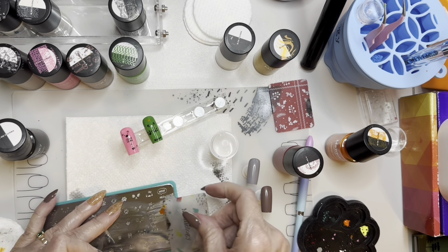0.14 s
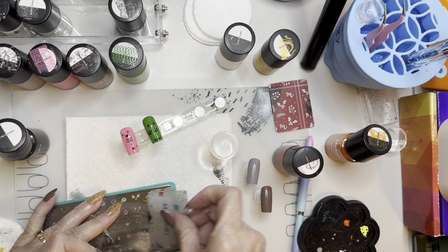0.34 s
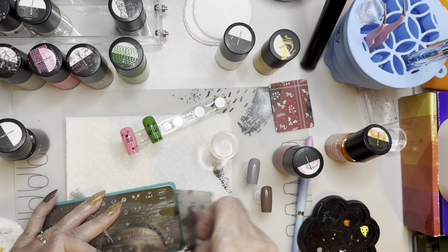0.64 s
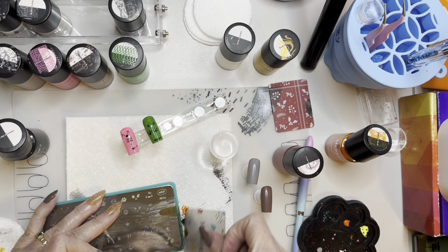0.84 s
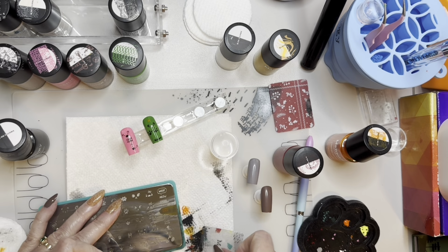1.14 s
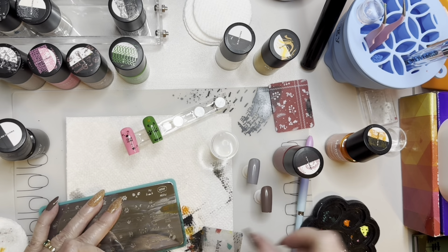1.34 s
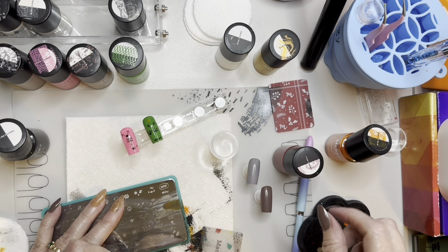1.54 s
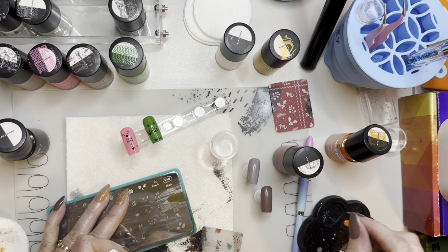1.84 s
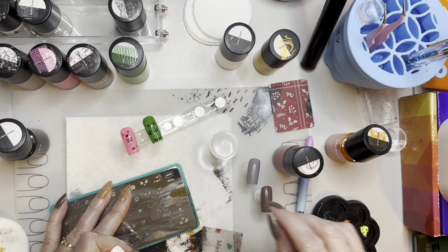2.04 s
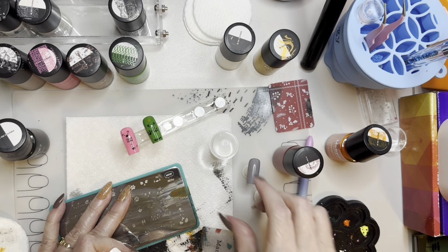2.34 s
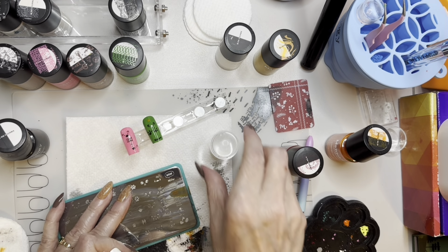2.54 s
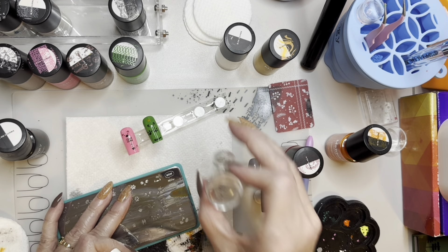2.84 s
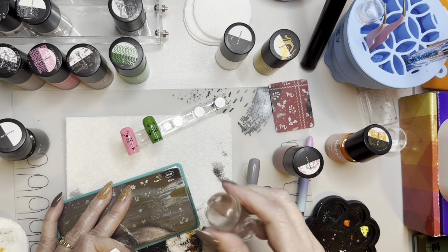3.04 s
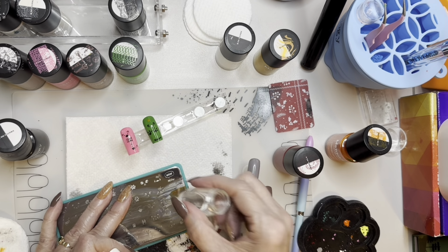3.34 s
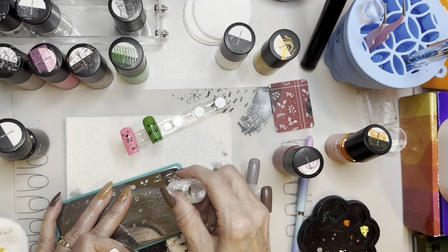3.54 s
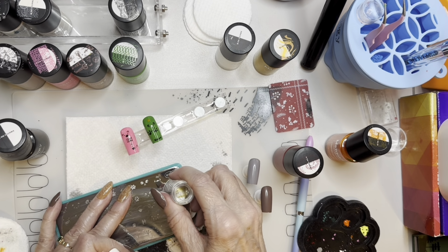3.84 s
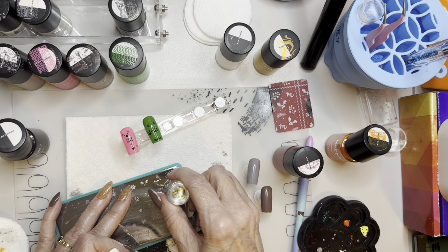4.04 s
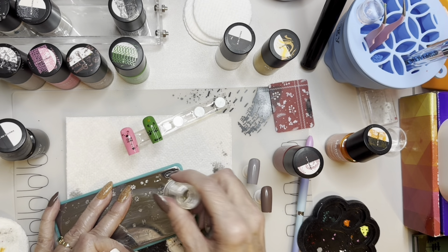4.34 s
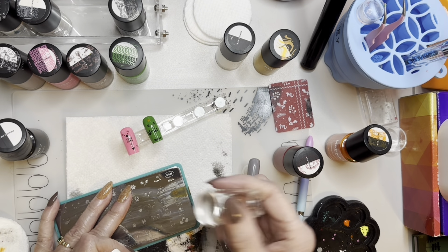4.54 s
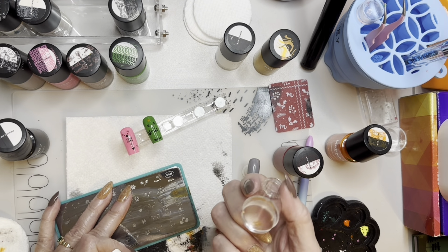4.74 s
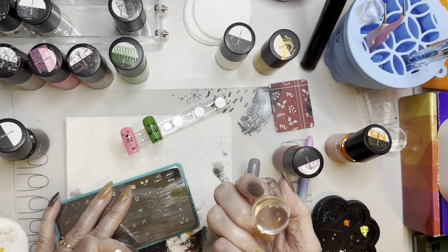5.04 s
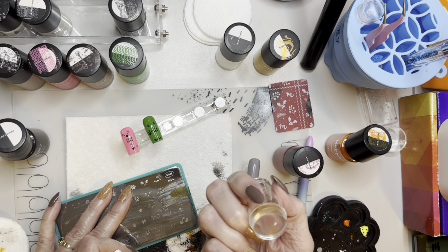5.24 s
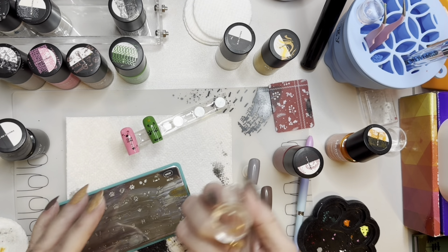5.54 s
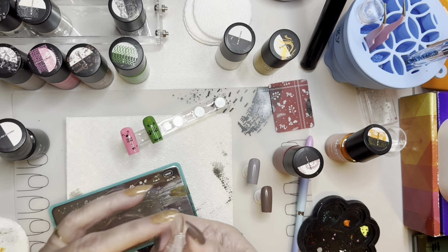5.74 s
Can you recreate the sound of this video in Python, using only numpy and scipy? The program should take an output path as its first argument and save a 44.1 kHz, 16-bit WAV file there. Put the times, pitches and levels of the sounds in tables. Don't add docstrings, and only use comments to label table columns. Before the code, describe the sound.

Close dry scraping and sharp snaps of plastic on metal, one hard slap on a desk, later a stuttering rub, over faint hum.

```python
import sys
import numpy as np
from scipy import signal
from scipy.fft import rfft, irfft, next_fast_len
from scipy.io import wavfile

SR = 44100
rng = np.random.default_rng(int(sys.argv[2]) if len(sys.argv) > 2 else 0)


def boost(x):
    u = np.asarray(x, float) / 20
    return 10 ** u


def master(y):
    cut = np.clip(np.atleast_2d(y).T, -1, 1)
    pcm = np.round(cut * 32767)
    wavfile.write(sys.argv[1], SR, pcm.astype(np.int16))


N = 260234
PADDED = next_fast_len(N + SR // 2)
STAMP_FROM_S = 3.1


def rms_one(x):
    return x / np.sqrt(np.mean(x ** 2) + 1e-20)


def at_hz(points, hz):
    table_hz, value = np.array(points)[:, 0], np.array(points)[:, 1]
    return np.interp(np.log(np.maximum(hz, 1)), np.log(table_hz), value)


def bins():
    return np.arange(PADDED // 2 + 1) * SR / PADDED


def drift(rate):
    r = np.exp(-40 * np.pi * rate / SR)
    slow = signal.lfilter([1], [1, -2 * r, r * r], rng.standard_normal(N // 20 + 2002))[2000:]
    return np.interp(np.arange(N) / 20, np.arange(len(slow)), rms_one(slow))


def coloured(spectrum):
    white = rfft(rng.standard_normal(PADDED))
    return irfft(white * boost(at_hz(spectrum, bins())))[:N]


def resonate(x, modes):
    out = 0
    for hz, width_hz, db in modes:
        r = np.exp(-np.pi * width_hz / SR)
        b = (1 - r * r) / 2 * np.array([1, 0, -1]) * boost(db)
        out = out + signal.lfilter(b, [1, -2 * r * np.cos(2 * np.pi * hz / SR), r * r], x + 1e-18)
    edges = [.84 * modes[0][0], min(1.08 * modes[-1][0], .45 * SR)]
    return signal.sosfilt(signal.butter(3, edges, "band", fs=SR, output="sos"), out)


def ticks(rows, column, modes, chatter_s=0.0028):
    rows, clicks = np.array(rows), np.zeros(N)
    np.add.at(clicks, np.round(rows[:, 0] * SR).astype(int), -boost(rows[:, column]))
    dying = signal.lfilter([0, 1], [1, -np.exp(-1 / (chatter_s * SR))], clicks + 1e-18)
    chatter = .05 * dying * rng.standard_normal(N)
    peak = np.abs(resonate(signal.unit_impulse(2000), modes)).max()
    return resonate(clicks + chatter, modes) / peak


def layered(s, db, bright_db, low_db):
    return np.column_stack(np.broadcast_arrays(s, db, db + bright_db, db + low_db))


# (frequency [Hz], density [dB per Hz])
HUM = [(15, -49.5), (25, -28), (39, -5.5), (59, 1), (177, -15.5), (206, -15), (311, -16.5), (361, -25.5),
       (468, -20.5), (784, -26), (855, -24.5), (1060, -33), (1900, -31), (4300, -49.5), (5590, -83.5),
       (9460, -120)]
# (frequency [Hz], side over mid [dB])
DIFFUSE = [(60, -33.5), (110, -26.5), (200, -9), (380, -6.5), (700, 2), (1290, 2), (2380, -20),
           (4400, -1.5), (8120, -11.5), (15000, 5)]
# (frequency [Hz], width [Hz], level [dB])
MOTOR = [(55, 3.9, -2), (124, 20, -8)]
HUM_DB, MOTOR_DB = -54.5, -59.5


def hum():
    mid = coloured(HUM)
    side = coloured([(hz, db + at_hz(DIFFUSE, hz)) for hz, db in HUM])
    gain = boost(HUM_DB + 1.2 * drift(2)) / np.std(mid)
    motor = boost(MOTOR_DB) * rms_one(resonate(rng.standard_normal(N), MOTOR))
    return gain * (mid + side * [[1], [-1]]) + motor


# (frequency [Hz], density [dB per Hz])
AIR_SPECTRUM = [(4000, -26), (5000, -11.5), (7300, -2.5), (10000, -9.5), (12000, -9), (15000, -2),
                (16500, -9)]
AIR_DB = -79.5


def air():
    return boost(AIR_DB) * rms_one(coloured(AIR_SPECTRUM))


ROOM_T60_S, TREBLE_T60_S, NEAR_T60_S = 0.33, 0.31, 0.022
ROOM_DB, NEAR_DB = -9, -6


def room(x):
    t = np.arange(SR // 2) / SR
    white = rng.standard_normal((2, 2, len(t))) * np.minimum(t / 0.0036, 1)
    dull = signal.sosfilt(signal.butter(2, 3000, fs=SR, output="sos"), white[0])
    tail = dull * boost(-60 * t / ROOM_T60_S) + (white[0] - dull) * boost(-60 * t / TREBLE_T60_S)
    near = white[1] * boost(-60 * t / NEAR_T60_S)
    answer = boost(ROOM_DB) * tail / np.linalg.norm(tail[0])
    answer = answer + boost(NEAR_DB) * near / np.linalg.norm(near[0])
    return irfft(rfft(answer, PADDED) * rfft(x, PADDED), PADDED)[:, :N]


# (frequency [Hz], phase [rad])
IN_STEP = [(30, 0), (520, 0)]
PORT_LEAD = [(900, .9), (1300, .1), (4600, -.7), (4950, -np.pi), (5200, -2 * np.pi), (7200, -2.03 * np.pi),
             (9650, -8.1)]
OPPOSED = [(10900, -2.98 * np.pi), (13900, -3.01 * np.pi), (14600, -3.3 * np.pi), (15800, -3.4 * np.pi)]
# (frequency [Hz], gain [dB])
PORT_COLOUR = [(3150, 0), (3700, -1.5), (4200, -1.5), (5500, -0.5), (10200, -1), (11200, -2), (13000, -12),
               (15000, -2.5)]


def ports(x, left_db):
    hz, side = bins(), np.array([[.5], [-.5]])
    lead = at_hz(list(IN_STEP) + list(PORT_LEAD) + list(OPPOSED), hz)
    louder_left = left_db * (hz > 700) * (hz < 5150) * (1 + 2 * (hz > 4700))
    response = np.exp(1j * lead * side) * boost(louder_left * side + at_hz(PORT_COLOUR, hz))
    return irfft(rfft(x, PADDED) * response, PADDED)[:, :N]


# (time [s], peak [dB])
THUMPS = [
    (0.122, -39),
    (0.727, -49),
    (1.221, -30.5),
    (3.177, -43.5),
    (3.197, -43),
]
# (frequency [Hz], width [Hz], level [dB])
DESK = [(75.4, 10, -2), (118, 36, -0.5), (181, 27, -2.5), (223, 29, -2), (330, 42, 0.5)]


def desk_thumps():
    return ticks(THUMPS, column=1, modes=DESK, chatter_s=0.035)


# (start [s], length [s], first level [dB], last level [dB], bright share [dB])
STROKES = [(0.0, .1, -66.5, -70.5, 3), (0.162, 0.082, -40.5, -46.5, -25.5),
           (0.246, .26, -46.5, -46.5, -24.5), (0.567, 0.15, -46.5, -54, -14),
           (0.938, .03, -70, -65.5, -2.5), (0.977, 0.13, -59.5, -56.5, 0), (1.143, .06, -66.5, -59.5, -2),
           (1.463, .26, -65, -69.5, 1.5), (1.788, .3, -61, -72, 3.5), (2.126, .2, -78.5, -77, -16),
           (2.413, 0.086, -79.5, -82, 3), (2.683, 0.095, -68, -87, 3.5), (2.959, 0.21, -88, -85, 12.5),
           (3.237, .1, -50, -62, -21.5), (3.377, .37, -51.5, -51.5, -20.5), (3.751, .33, -57, -76.5, -34),
           (4.304, 0.0835, -75, -75, 5), (4.425, 0.081, -65, -62, -29), (5.44, .05, -60, -71, 3.5),
           (5.527, 0.13, -83.5, -80.5, 13)]
# (start [s], level [dB], bright share [dB], length [s])
SLIPS = [(3.327, -48, -25.5, 0.007), (3.384, -49, -26, 0.0079), (3.396, -44, -22, 0.02),
         (3.425, -50, -22, 0.019), (3.446, -37.5, -17, 0.02), (3.472, -43, -12, .014),
         (3.508, -38.5, -15.5, 0.0098), (3.541, -39.5, -21, 0.012), (3.57, -38, -19, .012),
         (3.589, -43.5, -21, 0.015), (3.619, -36.5, -26, 0.011), (3.647, -41.5, -24, 0.014),
         (3.657, -42, -22.5, .016), (3.695, -37.5, -32.5, 0.012), (3.713, -44.5, -28, .014),
         (3.733, -44.5, -46, 0.02), (3.781, -50, -42, 0.011), (3.823, -55, -42, .008),
         (3.852, -56, -36, 0.004), (3.904, -63, -30.5, 0.0045), (3.949, -63, -30, 0.016),
         (4.425, -54, -28, 0.02), (4.45, -50.5, -22, 0.012), (4.469, -54, -28, .018),
         (4.538, -45, -28, .007)]
# (from [s], to [s])
ON_PLATE = [
    (.1, .9),
    (3.15, 4.15),
    (4.42, 4.6),
]
STROKE_ATTACK_S, STROKE_RELEASE_S, STROKE_LOW_DB = .015, .02, -6.5
SLIP_ATTACK_S, SLIP_RELEASE_S, SLIP_LOW_DB = .002, 0.0056, -18
PLATE_LOW_FOLLOWS = .6


def rubbing(column):
    t, level = np.arange(N) / SR, np.zeros(N)

    def add(s, length_s, db, attack_s, release_s):
        on = slice(int(max(s, 0) * SR), int((s + length_s + 8 * release_s) * SR))
        lift = np.exp(-np.maximum(t[on] - s - length_s, 0) / release_s)
        attack = np.clip((t[on] - s) / attack_s, 0, 1)
        level[on] += boost(np.interp(t[on], [s, s + length_s], db)) * lift * attack

    for s, length_s, first_db, last_db, bright_db in STROKES:
        db = np.array([first_db, last_db])
        metal = any(a < s < b for a, b in ON_PLATE)
        slack = (1 - PLATE_LOW_FOLLOWS) * (-50 - db) * metal
        share_db = [0, bright_db, STROKE_LOW_DB + slack][column - 1]
        add(s, length_s, db + share_db, STROKE_ATTACK_S, STROKE_RELEASE_S)
    for s, db, bright_db, length_s in SLIPS:
        share_db = [0, bright_db, SLIP_LOW_DB][column - 1]
        add(s, length_s, db + share_db + np.zeros(2), SLIP_ATTACK_S, SLIP_RELEASE_S)
    return level


def drag(column, on_metal, on_paper, per_s, size_db, stutter_db):
    sizes = boost(size_db * np.minimum(rng.exponential(1, N), 4)) * rng.standard_normal(N)
    grains, t = sizes * (rng.random(N) < per_s / SR), np.arange(N) / SR
    metal = sum((t > start) & (t < end) for start, end in ON_PLATE)
    rung = np.where(metal, rms_one(resonate(grains, on_metal)), rms_one(resonate(grains, on_paper)))
    return rubbing(column) * boost(stutter_db * drift(55)) * rung


# (frequency [Hz], width [Hz], level [dB])
DRAGGED_PLATE = [(2040, 90, -4), (2320, 100, 5.5), (2498, 120, -6), (2740, 150, -1.5), (3260, 200, -10),
                 (4200, 400, -24)]
DRAGGED_BRIGHT = [(5800, 140, 0.5), (6550, 400, -6), (7800, 500, -4.5), (8680, 1400, -14),
                  (14800, 1500, -18)]
PRESSED_PLATE = [(2045, 91, -5.5), (2306, 130, 5.5), (2614, 150, 4.5), (2798, 100, 6), (2960, 50, -8),
                 (4250, 370, -11.5)]
PLATE_BRIGHT = [(5430, 270, -1.5), (6310, 1300, 5), (8188, 560, -4), (8934, 1300, -4.5),
                (11600, 13000, -22.5), (14510, 500, -22)]
PAPER = [(1590, 1500, -8), (2500, 400, -5), (2950, 350, 3.5), (3900, 700, -4)]
PAPER_BRIGHT = [(5960, 800, -2.5), (7227, 1000, -7.5), (7517, 4100, -8), (9100, 4700, -2),
                (11676, 7500, -3), (15400, 660, -22)]
LOW = [(470, 140, 0.5), (644, 83, -3.5), (837, 140, -5), (1123, 88, 4.5), (1383, 150, -3), (1730, 180, -5)]


def rubbed():
    early = np.arange(N) < STAMP_FROM_S * SR
    card_body = drag(1, DRAGGED_PLATE, PAPER, per_s=17000, size_db=-3.5, stutter_db=-3.06)
    stamp_body = drag(1, PRESSED_PLATE, PAPER, per_s=12000, size_db=2.0, stutter_db=-0.16)
    card_bright = drag(2, DRAGGED_BRIGHT, PAPER_BRIGHT, per_s=19000, size_db=3.5, stutter_db=1.0)
    stamp_bright = drag(2, PLATE_BRIGHT, PAPER_BRIGHT, per_s=16000, size_db=-2.0, stutter_db=1.4)
    low = drag(3, LOW, LOW, per_s=9000, size_db=2.0, stutter_db=2.0)
    card = boost(-6.5) * card_body + boost(0.5) * card_bright
    stamp = boost(-11.0) * stamp_body + boost(-5.0) * stamp_bright
    return np.where(early, card, stamp) + boost(-3.5) * low


LOW_LAG_S = 0.00068


def late(low):
    return np.roll(low, int(LOW_LAG_S * SR))


# (time [s], peak [dB], bright share [dB], low share [dB])
CARD_TICKS = [(0.9534, -54, -1, 6), (1.0801, -54.5, 8.5, -13), (1.1, -38.5, -3, -10),
              (1.1051, -40, 0.5, -9.5), (1.1158, -31, 3.5, -10.5), (1.1249, -30, 2.5, -11),
              (1.1575, -38.5, -10, -11.5), (1.168, -38.5, 1.5, -20), (1.1935, -49.5, 10.5, -15.5),
              (1.9283, -64, 14, -13), (1.9375, -50, 7.5, -9.5), (1.9658, -67, 18, -6),
              (2.6974, -57.5, 4, -3), (2.7089, -41.5, 7.5, -2), (2.7552, -63, 9.5, -3),
              (2.7628, -70, 24.5, -3), (4.326, -61, 2, -7), (4.3538, -55, -4, -11), (4.3587, -64, 15, -13),
              (4.3636, -57.5, 11, -8), (4.3688, -57, -12, -15), (4.4, -49.5, 2, -3), (4.4024, -61, 1, 3),
              (5.466, -61, 11, -12)]
# (time [s], peak [dB], bright share [dB], low share [dB])
SLAP = [
    (1.2066, -37, -10, -13),
    (1.2119, -27, 3, -10),
    (1.2127, -19.5, 3, -10),
    (1.2151, -4, -4, -10),
    (1.2255, -25, -6, -3),
]
# (frequency [Hz], width [Hz], level [dB])
CARD = [(1398, 250, -4.5), (1806, 200, -9), (2600, 340, 3), (2950, 400, 1), (4100, 300, -10)]
CARD_LOW = [(600, 110, -3), (700, 120, -2), (1010, 260, -0.5), (1340, 360, 1.5)]


def card_flicks():
    rows = layered(*np.transpose(list(CARD_TICKS) + list(SLAP)))
    body = boost(-2.25) * ticks(rows, column=1, modes=CARD)
    bright = boost(4.75) * ticks(rows, column=2, modes=PAPER_BRIGHT)
    low = boost(-1.5) * ticks(rows, column=3, modes=CARD_LOW)
    return body + bright + late(low)


# (time [s], peak [dB], first flight [s], second flight [s], shrink of each later flight [ratio])
LANDINGS = [
    (0.1197, -18.5, 0.013, .0102, .82),
    (0.741, -27.5, .009, .0094, .88),
    (3.175, -19.5, .0179, .0116, .86),
]
# (bright share [dB], low share [dB])
LANDING_COLOUR = [(-6.5, -12.5), (-3.5, -4.5), (-12, -8.5)]
BOUNCE_LOSS_DB, BOUNCE_DULLS_DB = 2, 1.3
GROOVES = [0.6088, 0.6187, 0.6258, 0.6356, 0.6467, 0.6606, 0.6675, 0.6766, 0.6831, 0.6931, 0.7059]
GROOVE_DB, GROOVE_RISE_DB_PER_S, GROOVE_UNEVEN_DB = -36, 89.5, 2.2
GROOVE_BRIGHT_DB, GROOVE_LOW_DB = -6.5, -12.5
# (time [s], peak [dB], bright share [dB], low share [dB])
SNAPS = [(0.1114, -39.5, -11, -10.5), (0.2115, -43, -6.5, -4), (0.2331, -40, 4.5, -8.5),
         (0.4593, -41.5, -6, -10), (0.471, -36.5, 3.5, -6.5), (0.476, -47.5, 1, -3),
         (0.7156, -9, -2.5, -28), (0.7246, -10, -3, -2.5), (3.1662, -47, -15, -10.5),
         (3.461, -38, -3.5, -14), (3.5456, -37, -10.5, -11), (3.5718, -36, -16.5, -18),
         (3.5937, -38, -8, -10)]


def plate_ticks(count=10):
    k, runs = np.arange(count), []
    for (s, db, first_s, second_s, shrink), (bright_db, low_db) in zip(LANDINGS, LANDING_COLOUR):
        times = s + np.cumsum(np.r_[0, first_s, second_s * shrink ** k[:-2]])
        runs.append(layered(times, db - BOUNCE_LOSS_DB * k, bright_db - BOUNCE_DULLS_DB * k, low_db))
    s = np.array(GROOVES)
    db = GROOVE_DB + GROOVE_RISE_DB_PER_S * (s - s[0]) + GROOVE_UNEVEN_DB * rng.standard_normal(len(s))
    runs.append(layered(s, db, GROOVE_BRIGHT_DB, GROOVE_LOW_DB))
    runs.append(layered(*np.transpose(SNAPS)))
    return np.vstack(runs)


# (frequency [Hz], width [Hz], level [dB])
PLATE = [(2043, 50, -3.5), (2370, 140, 4.5), (2620, 300, -1.5), (2820, 260, -0.5), (3280, 170, -1),
         (4100, 400, -7.5)]
SCRAPER_LOW = [(632.5, 250, -5), (769.6, 130, -0.5), (1130, 200, 3), (1400, 130, -12)]


def plate_strikes():
    rows = plate_ticks()
    card, stamp = rows[rows[:, 0] < STAMP_FROM_S], rows[rows[:, 0] > STAMP_FROM_S]
    body = ticks(card, column=1, modes=PLATE) + ticks(stamp, column=1, modes=PRESSED_PLATE)
    bright = ticks(rows, column=2, modes=PLATE_BRIGHT)
    low = ticks(card, column=3, modes=SCRAPER_LOW) + ticks(stamp, column=3, modes=LOW)
    return boost(-0.75) * body + boost(4.0) * bright + boost(-0.5) * late(low)


# (from [s], to [s])
CARD_NEAR_S = (.93, 1.3)
CARD_ROOM_DB, UNLIKE_DB = -3.5, -5.5


def scene():
    desk = rubbed() + card_flicks() + plate_strikes()
    near = np.digitize(np.arange(N) / SR, CARD_NEAR_S) == 1
    shared, unlike = room(desk * boost(CARD_ROOM_DB * near))
    side = signal.sosfilt(signal.butter(4, [450, 5000], "band", fs=SR, output="sos"), unlike)
    heard = ports(desk + shared + desk_thumps() + air(), left_db=0.66)
    return heard + boost(UNLIKE_DB) * side * [[1], [-1]] + hum()


def roll_off(x):
    return signal.sosfilt(signal.butter(12, 17160, fs=SR, output="sos"), x)


def record(dry):
    cut = signal.sosfilt(signal.cheby2(12, 70, 16400, fs=SR, output="sos"), dry)
    return roll_off(cut)


dry = scene()
out = record(dry)
master(out)
```